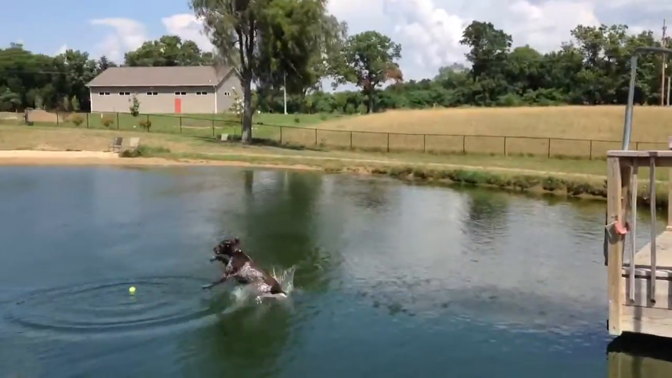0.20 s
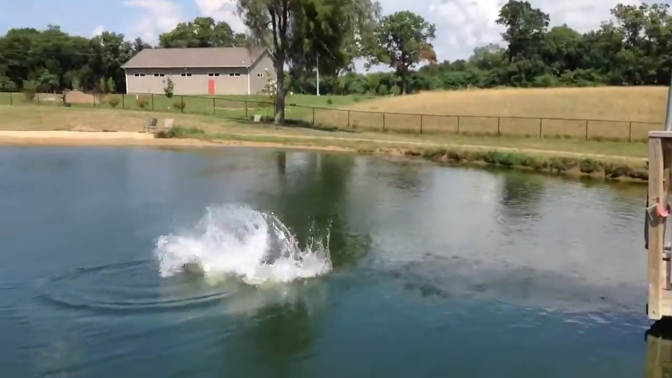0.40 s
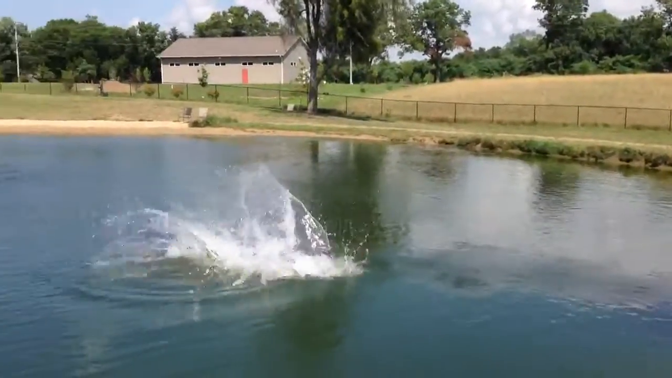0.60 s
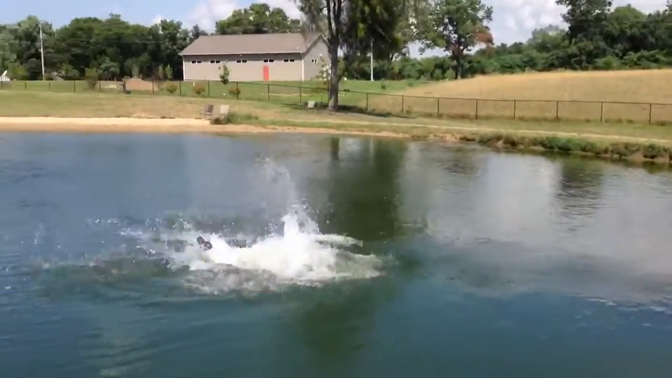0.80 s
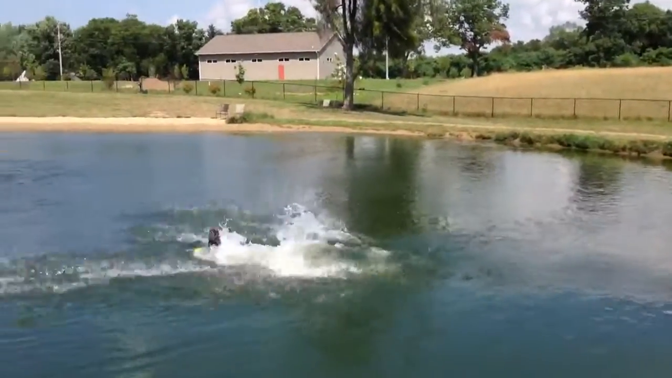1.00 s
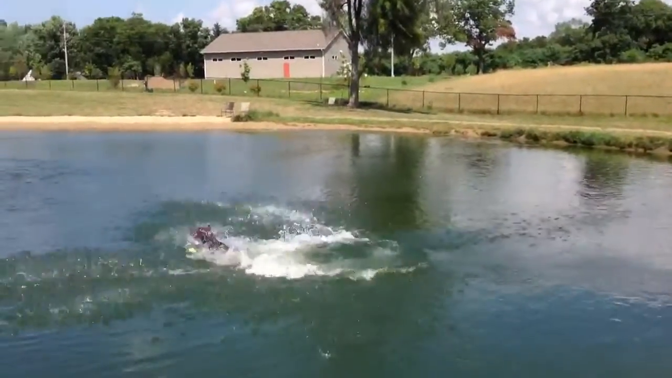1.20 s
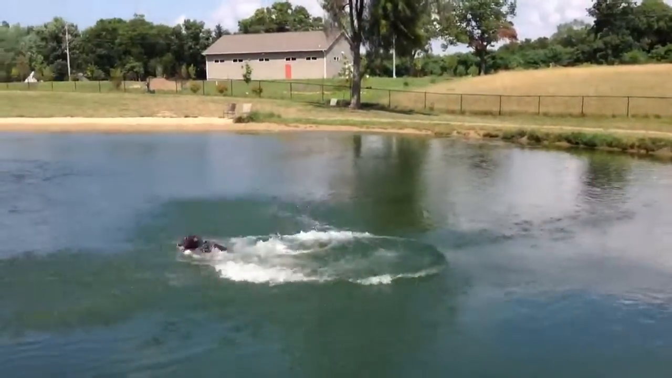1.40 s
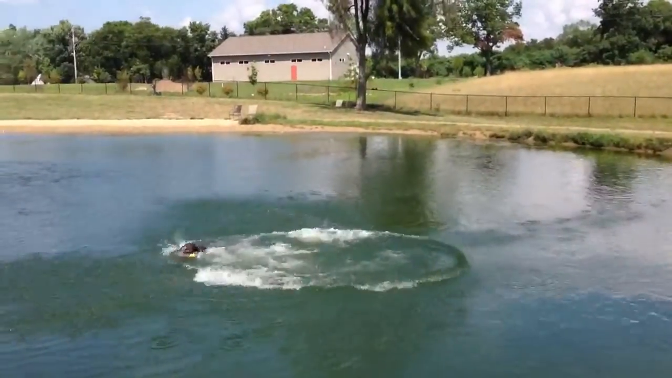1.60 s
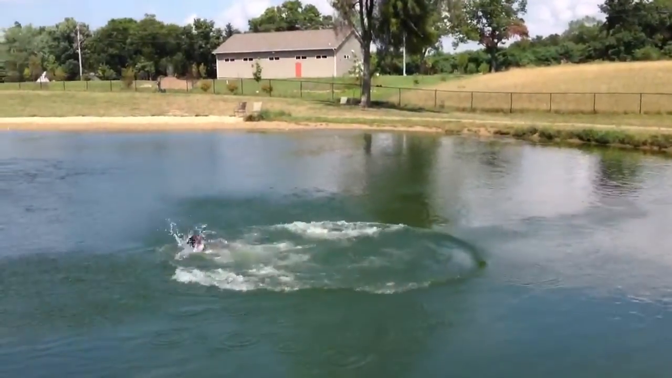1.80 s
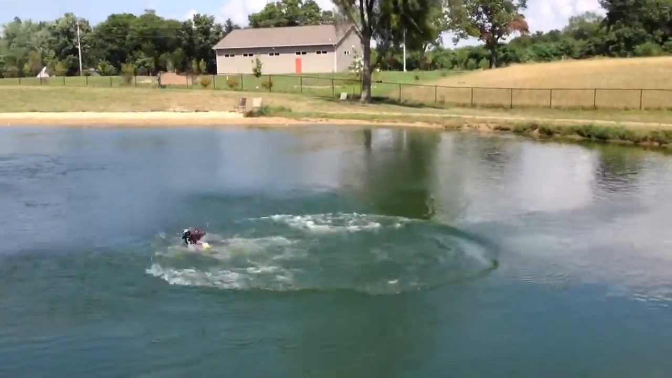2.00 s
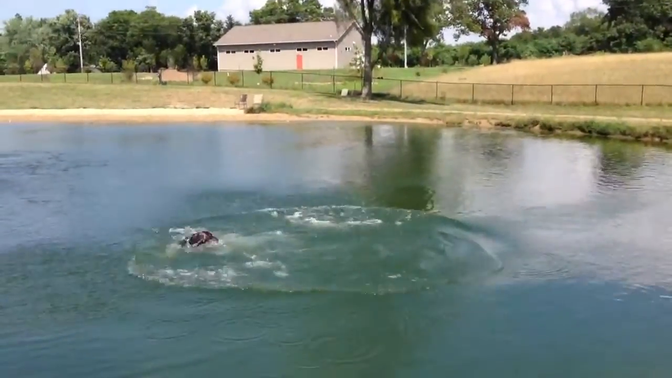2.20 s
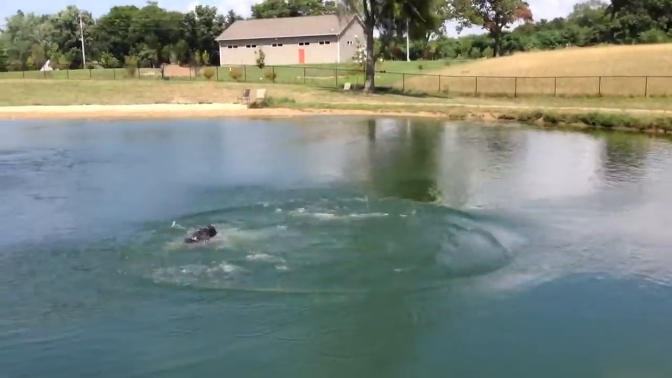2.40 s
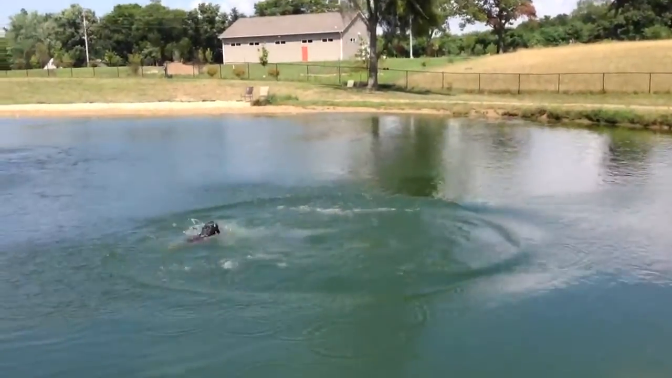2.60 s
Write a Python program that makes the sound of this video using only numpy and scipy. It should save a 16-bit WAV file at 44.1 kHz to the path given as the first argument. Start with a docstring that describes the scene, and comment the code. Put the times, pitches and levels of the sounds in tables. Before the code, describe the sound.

A dog's big splash into a pond. Faint open air until 0.23 s, then quick wet slaps and tearing water, with hollow bubble gulps to about 0.65 s. Spray patters and fizzes back from 0.65 to 1.3 s, with clumps near 0.8 and 1.0 s. Foam thins; small paddling splashes come around 1.5, 1.73 and 2.24 s, among ticking drips until about 2.6 s. Thin small-microphone sound, faint short bank reflections.

```python
"""Faint open air, then at about 0.23 s a dog leaps into a farm pond: legs and chest slap the surface.
Slaps and torn water are shaped noise; the air cavity closes in gulps, each a decaying, rising sine.
Spray is random drop impacts and bubble rings, thinning to foam and drips as the dog paddles
with small splashes. A diffuse noise tail answers from the banks."""
import sys
import numpy as np
from scipy import signal
from scipy.fft import rfft, irfft, next_fast_len
from scipy.io import wavfile
from scipy.ndimage import map_coordinates

SR = 44100
rng = np.random.default_rng(int(sys.argv[2]) if len(sys.argv) > 2 else 0)


def file_out(sig):
    """Save sig as 16-bit WAV at sys.argv[1]."""
    # one column per channel
    cols = np.atleast_2d(sig).T
    # limit, then scale
    lim = np.clip(cols, -1, 1)
    pcm = np.round(lim * 32767).astype(np.int16)
    wavfile.write(sys.argv[1], SR, pcm)


N = 114660  # samples

# body slaps: peak t/s, level/dB, rise/s, fall/s
BODY_SLAPS = [(.2339, -28, 0.00093, 0.001), (.2655, -27.5, 0.0022, .0028), (.279, -24, 0.0023, 0.0035),
              (.2845, -23.5, 0.0013, 0.0057), (.299, -21, .0005, 0.0033), (.305, -24.5, 0.001, 0.0015),
              (.323, -25.5, 0.0033, 0.0075), (.3335, -28.5, 0.0042, 0.0029), (.3715, -22.5, 0.0038, 0.0021)]
# sheet of water torn up on entry: t/s, level/dB
WATER_SHEET = [(.23, -84), (.237, -39), (.257, -45), (.275, -33.5), (.31, -34.5), (.35, -35.5), (.385, -31),
               (.42, -40), (.46, -46), (.492, -37), (.525, -43.5), (.6, -49), (.72, -62)]
# air pockets closing under the body: onset t/s, f/Hz, level/dB, life/cycles
AIR_GULPS = [(.2333, 1430, -20.5, 2.7), (.264, 1605, -19.5, 5), (.2815, 1750, -21, 9.8),
             (.283, 430, -22.5, 3.9), (.2975, 555, -19, 0.8), (.3318, 1460, -14.5, 2.4),
             (.332, 1046, -17, 2.8), (.362, 321, -24, 3.6), (.367, 800, -25.5, 7.2),
             (.378, 398, -20.5, 2.2), (.383, 174.6, -15, 1.1), (.408, 677, -20.5, 4.3), (.411, 563, -24, 4),
             (.412, 276, -21, 2.5), (.415, 154, -13, 0.84), (.452, 334, -25, 3.2), (.46, 223, -26, 2.9),
             (.497, 229, -32, 2.3), (.513, 408, -32, 1.7), (.53, 174, -24.5, 1.8), (.544, 293, -30.5, 2.6),
             (.566, 380, -30, 3.8), (.592, 177, -34, 2.3), (.616, 164, -33, 1.4), (.641, 296, -37, 2.6),
             (.645, 402, -30.5, 3.8), (1.032, 186, -21, 0.67), (1.228, 171, -24.5, 0.81),
             (1.262, 450, -29, 1.5), (1.652, 614, -36.5, 3.5), (1.655, 297, -31, 0.47),
             (2.504, 237, -34.5, 0.87), (2.5055, 483, -31, 0.94), (2.507, 920, -25, 0.83)]
# large bubbles churning in the cavity: t/s, level/dB
CAVITY_CHURN = [(.26, -89), (.285, -50.5), (.35, -48), (.385, -34), (.44, -39), (.49, -34), (.56, -38.5),
                (.65, -43.5), (.7, -48.5), (.8, -61.5), (1.0, -59), (1.55, -66.5), (1.8, -70)]
# falling spray and foam: t/s, bubble level/dB, impact level/dB
SPRAY_LEVELS = [(.22, -89, -91), (.4, -39, -47), (.55, -46.5, -49.5), (.64, -38, -43), (.79, -38, -39),
                (.94, -42.5, -39), (.98, -44.5, -40), (1.03, -42, -37), (1.13, -43, -38),
                (1.18, -48.5, -44), (1.3, -46, -44), (1.45, -48.5, -49.5), (1.65, -49, -52),
                (1.8, -56, -52.5), (1.88, -54, -60), (1.96, -57.5, -56), (2.1, -57.5, -57),
                (2.35, -63, -64), (2.6, -66, -72)]
# spray landing in clumps: peak t/s, level/dB, rise/s, fall/s
SPRAY_CLUMPS = [(.781, -32, 0.0036, 0.0035), (.794, -36, .003, .004), (.898, -38, .003, 0.0061),
                (1.017, -32, 0.0016, .005), (1.034, -41, .004, .005), (1.058, -40, .002, 0.0044),
                (1.114, -33, .002, 0.0049), (1.125, -45, 0.0022, 0.0035)]
# plinking drops: t/s, level/dB
DROPLET_LEVELS = [(.25, -100), (.75, -48), (1.1, -46), (1.4, -57), (1.7, -56.5), (2.1, -60.5), (2.6, -60.5)]
# small splashes of the paddling dog: peak t/s, level/dB, rise/s, fall/s
PADDLE_SPLASHES = [(1.527, -44.5, 0.0062, 0.015), (1.7262, -33, 0.0026, 0.0025),
                   (1.7345, -37, 0.0018, 0.0076), (1.885, -49.5, 0.01, 0.015),
                   (2.226, -46.5, 0.0045, 0.012), (2.2465, -41.5, 0.0037, 0.0043),
                   (2.253, -44.5, 0.0017, 0.0074)]
# water stirred by paw strokes: peak t/s, level/dB, rise/s, fall/s
PAW_WASHES = [(1.53, -48.5, 0.0062, 0.026), (1.657, -49.5, 0.012, 0.013), (1.86, -51, 0.044, 0.045),
              (2.03, -60, 0.028, 0.034), (2.243, -54, 0.025, 0.0075), (2.585, -56, 0.018, 0.015)]
# drops ticking on the surface: peak t/s, level/dB, rise/s, fall/s
DROP_TICKS = [(.2547, -37, 0.00036, 0.00086), (1.0045, -32, .0005, 0.00092), (1.09, -41, .0005, .001),
              (1.2215, -33.5, .0004, .0008), (1.477, -35, 0.00037, 0.0011), (1.4935, -48, .0006, 0.0012),
              (1.7935, -41, .0006, 0.0011), (1.84, -47, .0005, 0.0011), (2.015, -44, .0005, .001),
              (2.059, -43.5, 0.00063, 0.00093), (2.17, -47, .0005, 0.00085), (2.388, -47, .0008, 0.0015),
              (2.488, -53.5, 0.00073, 0.0016), (2.5285, -45.5, 0.00048, 0.0008),
              (2.5745, -40.5, 0.00054, 0.00069)]
# drips ringing one bubble each: onset t/s, f/Hz, level/dB, life/cycles
BUBBLE_DRIPS = [(.955, 1310, -26, 2.5), (1.4935, 4090, -24, 5.4), (1.827, 1150, -47, 6),
                (1.843, 672, -48, 5), (1.848, 436, -45, 4.3), (1.862, 680, -46, 5),
                (1.879, 673, -42.5, 6.7), (2.22, 1440, -37, 3), (2.244, 455, -40, 2.8),
                (2.432, 1210, -43.5, 6.5), (2.519, 1970, -44, 4.6), (2.554, 1290, -41.5, 2.7),
                (2.5745, 780, -45, 4), (2.584, 950, -39, 2.4)]

# spectral shapes, overall level normalised out: f/Hz, relative level/dB
SLAP_SHAPE = [(100, -17.5), (300, -11.5), (480, -4), (950, -7.5), (1350, -7), (1750, -1), (2200, -6),
              (2900, -13.5), (3700, -5.5), (6000, -11), (9000, -15.5), (15500, -23.5)]
SHEET_SHAPE = [(100, -40), (300, -11.5), (600, 0.5), (1700, 0), (2800, -3), (3700, -3.5), (7000, -8.5),
               (15500, -16)]
CHURN_SHAPE = [(30, -3), (85, -10.5), (145, -2.5), (260, 1.5), (400, 1), (700, -9.5), (1200, -24.5),
               (3000, -55)]
BUBBLE_SHAPE = [(100, -31), (280, -17), (450, -0.5), (700, 2.5), (1000, 0), (1700, -2.5), (2200, -2.5),
                (2800, -16.5), (4000, -8), (8000, -31.5)]
IMPACT_SHAPE = [(300, -30), (1500, 2.5), (2300, -3.5), (2850, -5.5), (3400, 0.5), (4300, -3), (6000, -4.5),
                (8000, -7.5), (11000, -10.5), (15500, -16)]
DROPLET_SHAPE = [(400, -5.5), (800, -5), (1600, -2.5), (2200, -2), (2850, -12), (3900, -7), (6000, -14.5),
                 (10000, -23)]
PADDLE_SHAPE = [(80, -15), (200, -12), (700, -3.5), (1600, 2.5), (2800, -6), (4000, -3), (8000, -11.5),
                (15500, -14.5)]
TICK_SHAPE = [(200, -15), (1500, 4), (2700, -26), (4500, -1.5), (7000, -4.5), (11000, -6.5), (15500, -15)]
AIR_SHAPE = [(25, 9), (70, 5.5), (160, -3.5), (280, -9), (420, -4), (800, -12.5), (1200, -5), (1800, -10),
             (2850, -15), (3900, -12.5), (7100, -19.5), (15500, -21)]
# decay of the bank reflections: f/Hz, t60/s
BANK_DECAY = [(200, 0.2), (2000, 0.22), (12000, 0.35)]

GULP_GLIDE, DRIP_GLIDE = 0.052, 0.011  # fractional pitch rise per life
AIR_DB, BANK_DB = -59, -15.5
TOP_HZ = 15450


def entry():
    """The body slaps the pond and tears up a crackling sheet: impulses plus noise, unsteady in level."""
    level, = gains(WATER_SHEET)
    crackle = patter(spread_db=-0.5, count=9000) + 0.57 * white()
    flutter = amp(2.1 * wobble(rate_hz=110))
    sheet = level * flutter * coloured(crackle, SHEET_SHAPE)
    return bursts(BODY_SLAPS, SLAP_SHAPE) + sheet


def cavity():
    """The hole behind the dog closes in ringing gulps and breaks into large, low bubbles."""
    level, = gains(CAVITY_CHURN)
    churn = swarm(low_hz=127.7, high_hz=1074, cycles=2.34, glide=0.053,
                  spread_db=0.5, count=2000, size=3000)
    return rings(AIR_GULPS, GULP_GLIDE) + level * coloured(churn + 0.87 * white(), CHURN_SHAPE)


def spray():
    """Drops strike the surface and leave small ringing bubbles; some land in clumps."""
    bubble_level, impact_level = gains(SPRAY_LEVELS)
    bubbles = swarm(low_hz=329.0, high_hz=6070, cycles=3.74, glide=0.012,
                    spread_db=1.5, count=6000, size=900)
    tiny_rings = swarm(low_hz=2540, high_hz=12560, cycles=5.8, glide=0.023,
                       spread_db=2.0, count=4000, size=200)
    impacts = patter(spread_db=2.5, count=4500) + 0.63 * tiny_rings
    body = bubble_level * coloured(bubbles + 1.1 * white(), BUBBLE_SHAPE)
    fizz = impact_level * coloured(impacts + 1.3 * white(), IMPACT_SHAPE)
    flutter = amp(0.96 * wobble(rate_hz=44.1))
    return flutter * (body + fizz) + bursts(SPRAY_CLUMPS, IMPACT_SHAPE)


def droplets():
    """Drops in the wash, each ringing its own bubble."""
    level, = gains(DROPLET_LEVELS)
    plinks = swarm(low_hz=593, high_hz=7940, cycles=5.1, glide=0.047,
                   spread_db=2.5, count=900, size=1500)
    return level * coloured(plinks, DROPLET_SHAPE)


def swimming():
    """Paws break the surface, stir up gurgling bubbles and shed drips."""
    gurgle = swarm(low_hz=380, high_hz=1910, cycles=4.3, glide=0.033,
                   spread_db=3, count=1500, size=2500)
    wash = swells(PAW_WASHES) * coloured(gurgle, BUBBLE_SHAPE)
    splashes = bursts(PADDLE_SPLASHES, PADDLE_SHAPE)
    ticks = bursts(DROP_TICKS, TICK_SHAPE)
    return wash + splashes + ticks + rings(BUBBLE_DRIPS, DRIP_GLIDE)


def bank(x):
    """Faint, diffuse answer of the banks: x convolved with noise decaying at a rate set per frequency."""
    hz, t, z = signal.stft(rng.standard_normal(SR // 2), SR, nperseg=256)
    decay = amp(-60 * t / along(BANK_DECAY, hz)[:, None])
    tail = signal.istft(z * decay, SR, nperseg=256)[1]
    return amp(BANK_DB) * signal.fftconvolve(x, tail / np.linalg.norm(tail))[:N]


def open_air():
    """Quiet open air: steady coloured noise."""
    return amp(AIR_DB) * coloured(white(), AIR_SHAPE)


def bubble(t, hz, cycles, glide):
    """A bubble's ring: soft start, rising pitch, exponential decay."""
    age = t * hz / cycles  # in lives
    attack = 1 - np.exp(-2 * t * hz)
    phase = 2 * np.pi * hz * t * (1 + glide * np.minimum(age, 10) / 2)
    return attack * np.exp(-age) * np.sin(phase)


def rings(rows, glide):
    """One ringing bubble per row."""
    t = np.arange(N) / SR
    return sum(amp(db) * bubble(np.maximum(t - s, 0), hz, cycles, glide)
               for s, hz, db, cycles in rows)


def swarm(low_hz, high_hz, cycles, glide, spread_db, count, size):
    """count random bubbles of size samples; strength proportional to pitch evens the spectrum."""
    when, pitch, life, strength = rng.random((count, 4)).T[:, :, None]
    hz = low_hz * (high_hz / low_hz) ** pitch
    life_cycles = cycles * 2 ** (2 * life - 1)
    grains = bubble(np.arange(size) / SR, hz, life_cycles, glide)
    grains = grains * hz * sizes(strength, spread_db)
    at = (when * N).astype(int) + np.arange(size)
    return unit(np.bincount(at.ravel(), grains.ravel(), N)[:N])


def patter(spread_db, count):
    """count drop impacts: single-sample impulses of random time, size and sign."""
    when, strength, sign = rng.random((count, 3)).T
    impulses = np.sign(sign - .5) * sizes(strength, spread_db)
    return unit(np.bincount((when * N).astype(int), impulses, N))


def sizes(u, spread_db):
    """Grain sizes from uniform draws; a positive spread gives many small, few large."""
    return amp(-spread_db * np.log(u + .02))


def bursts(rows, shape):
    """Noise that swells and dies around each contact with the water, then is coloured."""
    level = swells(rows)
    rms = np.sqrt(np.mean(level ** 2))  # restores the level that coloured() normalises
    return rms * coloured(level * white(), shape)


def swells(rows):
    """Gain rising and falling exponentially around each row's peak, summed in power."""
    t = np.arange(N) / SR
    power = np.zeros(N)
    for s, db, rise_s, fall_s in rows:
        lives = np.maximum((s - t) / rise_s, (t - s) / fall_s)
        power += (amp(db) * np.exp(-lives)) ** 2
    return np.sqrt(power)


def gains(rows):
    """One gain curve for each dB column after the time, linear in dB between rows."""
    s, *columns = np.transpose(rows)
    return [amp(np.interp(np.arange(N) / SR, s, db)) for db in columns]


def wobble(rate_hz):
    """Smooth random curve, rate_hz knots a second."""
    knots = rng.standard_normal(N // 20)
    return map_coordinates(knots, [np.arange(N) * rate_hz / SR], mode="wrap")


def coloured(x, shape):
    """x through a causal minimum-phase filter of that shape, at rms 1."""
    m = 2 * next_fast_len(N)
    log_gain = np.log(amp(along(shape, np.fft.rfftfreq(m, 1 / SR))))
    cepstrum = irfft(log_gain, m)
    cepstrum[1:m // 2] *= 2  # fold onto positive time
    cepstrum[m // 2 + 1:] = 0
    return unit(irfft(rfft(x, m) * np.exp(rfft(cepstrum)), m)[:N])


def filtered(x, response):
    """x times a response of frequency, zero phase."""
    m = next_fast_len(N + SR // 2)
    return irfft(rfft(x, m) * response(np.fft.rfftfreq(m, 1 / SR)), m)[:N]


def along(points, hz):
    """(f/Hz, value) points interpolated on a log axis."""
    f, v = np.transpose(points)
    return np.interp(np.log(hz + 1), np.log(f + 1), v)


def white():
    """White Gaussian noise."""
    return rng.standard_normal(N)


def unit(x):
    """Scaled to rms 1."""
    return x / np.sqrt(np.mean(x ** 2) + 1e-20)


def amp(db):
    """Decibels to gain."""
    return 10 ** (np.asarray(db) / 20)


def scene():
    """The splash on the open pond, one channel."""
    water = entry() + cavity() + spray() + droplets() + swimming()
    return (water + bank(water) + open_air())[None]


def record(dry):
    """A small microphone with little deep bass and a steep band limit."""
    low_cut_hz, leak_db = 125, -34
    high_pass = signal.butter(4, low_cut_hz, "high", fs=SR, output="sos")
    thin = signal.sosfilt(high_pass, dry[0]) + amp(leak_db) * dry[0]
    return filtered(thin, lambda hz: 1 / (1 + (hz / TOP_HZ) ** 200))[None]


dry = scene()
out = record(dry)
file_out(out)
```